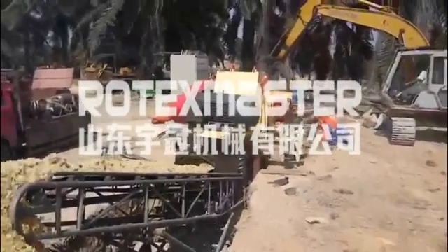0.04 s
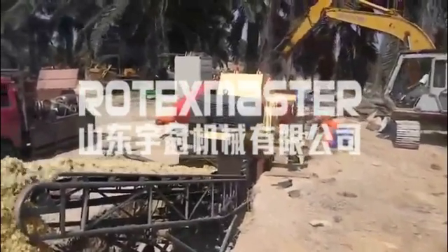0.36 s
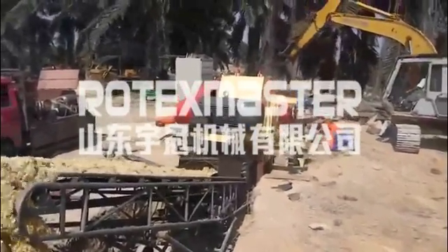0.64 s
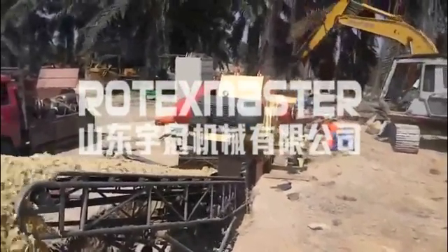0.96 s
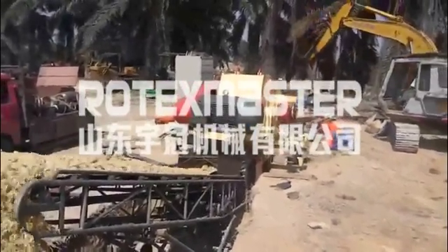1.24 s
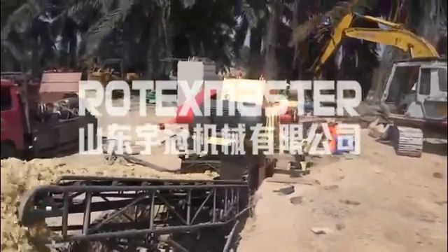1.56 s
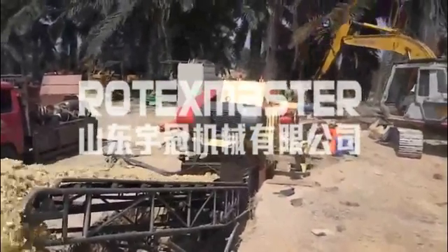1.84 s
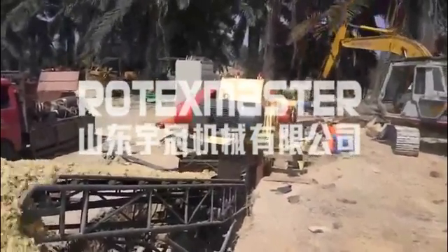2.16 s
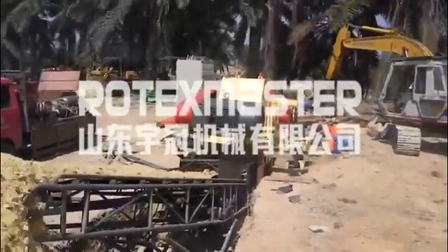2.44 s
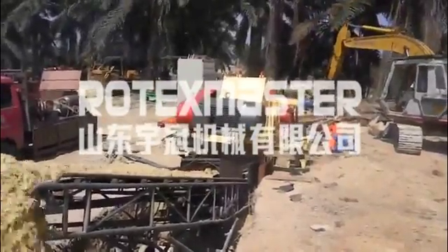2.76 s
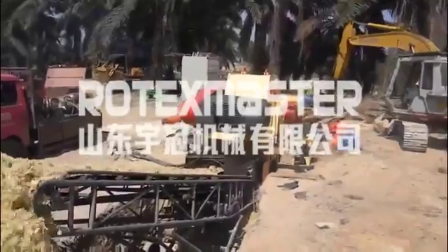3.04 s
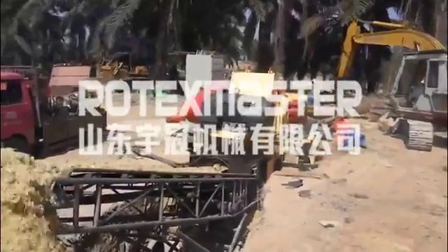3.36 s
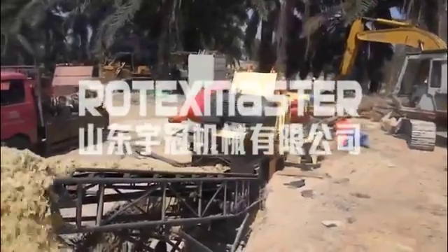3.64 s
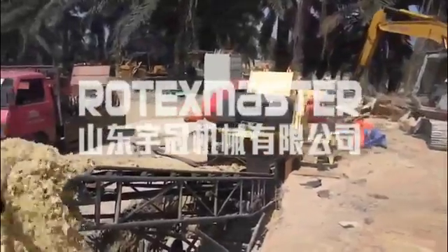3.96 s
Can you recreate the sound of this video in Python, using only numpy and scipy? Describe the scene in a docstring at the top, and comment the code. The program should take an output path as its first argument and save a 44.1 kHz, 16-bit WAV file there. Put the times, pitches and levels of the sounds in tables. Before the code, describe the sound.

A diesel wood chipper roars close by outdoors for all four seconds, its drum thumping rapidly over engine drone, crackling chips and a faint high whine. An excavator's low hum swells and sinks alongside. Wood knocks against steel around 0.5 seconds, near 1.9 and in a cluster at 2.6. From 2 seconds, chips leave in brief hissing sprays, and splinters rasp along the chute, most strongly near 3.4.

```python
"""A fast thumping comes first: a diesel drum chipper, close by at an outdoor site, in stereo.
The drum thumps once a turn in its housing over the engine's drone; an excavator runs beside it.
Shredded wood roars through the machine, chips crackle and splinters rasp along the chute.
Now and then a larger piece knocks against the steel; later, chips leave in brief sprays."""
import sys
import numpy as np
from scipy import signal
from scipy.fft import rfft, irfft
from scipy.io import wavfile

SR = 44100
rng = np.random.default_rng(int(sys.argv[2]) if len(sys.argv) > 2 else 0)


def master_out(mix):
    """Clip the mix to full scale and print it as 16-bit PCM to the path in sys.argv[1]."""
    frames = np.transpose(np.atleast_2d(mix))
    ceiling = np.clip(frames, -1, 1)
    pcm = np.round(ceiling * 32767).astype(np.int16)
    wavfile.write(sys.argv[1], SR, pcm)


N = 176400
BIN_HZ = np.maximum(np.arange(N // 2 + 1) * SR / N, 1)


def undb(db):
    """Decibels to gain."""
    return 10 ** (np.asarray(db) / 20)


def level(x, db=0):
    """Set the rms level."""
    return x * undb(db) / np.sqrt(np.mean(x ** 2))


def follow(t, points):
    """Read (t/s, value) points at the times t."""
    return np.interp(t, *np.array(points).T)


def curve(points):
    """Read (f/Hz, value) points on a log-frequency axis."""
    hz, value = np.array(points).T
    return np.interp(np.log(BIN_HZ), np.log(hz), value)


def bell(x):
    """Gaussian with a peak and a spread of 1."""
    return np.exp(-.5 * x ** 2)


def colour(x, points):
    """Causal filter with the given (f/Hz, gain/dB) shape."""
    cepstrum = irfft(np.log(undb(curve(points))), N)
    cepstrum[1:N // 2] *= 2
    cepstrum[N // 2 + 1:] = 0
    return irfft(rfft(x) * np.exp(rfft(cepstrum)), N)


def band(x, hz, octaves):
    """Broad bell-shaped band."""
    return irfft(rfft(x) * bell(np.log2(BIN_HZ / hz) / octaves), N)


def lowpass(x, hz, order=4):
    """Keep what lies below hz, with no phase shift."""
    return irfft(rfft(x) / (1 + (BIN_HZ / hz) ** order), N)


def resonance(hz, width):
    """Response of one damped mode."""
    return 1 / (1 + 1j * (BIN_HZ ** 2 - hz ** 2) / (BIN_HZ * width))


def drift(rate_hz):
    """Smooth random motion with a spread of 1."""
    return level(lowpass(rng.standard_normal(N), rate_hz))


def clicks(times, sizes):
    """One impulse at each time."""
    return np.bincount(np.clip(times * SR, 0, N).astype(int), sizes, N + 1)[:N]


# width at the microphones: f/Hz, side minus mid/dB
STEREO_WIDTH = [(60, -21.5), (170, -34), (280, -12.5), (500, -10.5), (1200, -8.5), (2500, -7.5), (9000, -7)]
# balance: f/Hz, left minus right/dB
STEREO_PAN = [(60, -3.5), (180, -1.5), (350, -7), (700, -3.5), (1400, -1.7), (2800, -2.5), (5000, 1.2),
              (9000, -1.5)]
# lead of the left microphone: f/Hz, phase/rad
LEFT_LEAD = [(0, 0), (340, -0.051), (600, 0.7), (1380, 0.29), (3360, 0.76), (4220, 0.55), (5430, 0.2),
             (8530, -0.62), (9820, 0.0)]

def stereo_noise():
    """Noise alike in the bass, wide in the treble, reaching the two microphones out of step."""
    mid, side = rfft(rng.standard_normal((2, N)))
    sign = np.array([[1], [-1]])
    microphones = undb(sign * curve(STEREO_PAN) / 2) * np.exp(.5j * sign * curve(LEFT_LEAD))
    return irfft((mid + sign * side * undb(curve(STEREO_WIDTH))) * microphones, N)


# ring of the drum housing: f/Hz, gain/dB
HOUSING_RING = [(30, -30), (44, -15.5), (90, -17.5), (120, -16.5), (170, -3), (200, -2.5), (224, 1.5),
                (255, -1.5), (290, -13), (310, -10.5), (345, -29.5), (400, -14.5), (520, -32),
                (1500, -53.5)]
# strength of the thumps: t/s, relative level/dB
THUMP_FORCE = [(0, -4.5), (.2, 0), (.4, -4), (.75, -3), (1.05, -1.5), (1.5, .5), (2.3, -0.5), (2.52, 2),
               (2.75, -4), (3.5, 1), (4, 0.5)]
# heavy bites into the wood: t/s, boost/dB
HEAVY_BITES = [(.226, 5), (.271, 4.5), (.497, 4.5), (1.538, 2.5), (1.72, 2), (1.90, 3), (2.945, 5.5),
               (3.21, 4.5)]

def drum(t, turns):
    """One uneven thump a turn rings the housing, harder when the drum bites deep."""
    delay_s, jitter_s, scatter_db, pan_db = .0003, .00015, .8, -.4
    size, late = rng.standard_normal((int(turns[-1]) + 1, 2)).T
    times = np.interp(np.arange(len(size)), turns, t) + delay_s + jitter_s * late
    force_db = follow(times, THUMP_FORCE) + scatter_db * size
    for at, db in HEAVY_BITES:
        force_db[np.argmin(abs(times - at))] += db
    thumps = level(colour(clicks(times, undb(force_db)), HOUSING_RING), db=-23.8)
    return thumps * undb([[pan_db / 2], [-pan_db / 2]])


# the diesel, centred between the microphones: multiple of shaft speed, level/dB
ENGINE_HARMONICS = [(2, -38), (3, -33.5), (4, -39.5), (5, -44.5), (6, -33), (7, -43.5)]

def engine(turns):
    """The firing drone is locked to the shaft; each harmonic wavers on its own."""
    waver_db, exhaust_lag_turns = 2, .555
    phase = 2 * np.pi * (turns - exhaust_lag_turns)
    return sum(undb(db + waver_db * drift(4.8)) * np.sqrt(2) * np.cos(k * phase)
               for k, db in ENGINE_HARMONICS)


# other machinery on the site: f/Hz, width/Hz, level/dB
MACHINE_HUMS = [(182.2, 5.7, -32.5), (202.6, 3.7, -32), (379, 6.8, -44), (402.8, 6.8, -42.5),
                (416, 4.9, -39.5), (604.3, 12, -40.5), (775, 40, -43)]

def machinery():
    """Other machinery hums in narrow bands of noise that waver together."""
    waver_db = 1.5
    power = sum(level(abs(resonance(hz, width)) ** 2, db) ** 2 for hz, width, db in MACHINE_HUMS)
    return irfft(rfft(stereo_noise()) * np.sqrt(power), N) * undb(waver_db * drift(1.9))


# rumble and roar from inside the drum, each: f/Hz, gain/dB
WOOD_RUMBLE = [(20, -27.5), (45, -17.5), (70, -6), (95, -2.5), (135, -1), (170, -0.5), (225, -2.5),
               (270, -9), (330, -20), (600, -40)]
WOOD_ROAR = [(150, -6.5), (330, -1), (440, 2.5), (540, 0.5), (730, 3), (980, -3.5), (1150, -3),
             (1500, -5.5), (1780, -4), (2050, -8.5), (2450, -7), (3300, -12.5), (3600, -16.5),
             (4300, -15.5), (5000, -18.5), (5400, -20), (6800, -22.5), (7100, -25), (8200, -21.5),
             (8800, -24.5), (10200, -38)]
# the roar above 2 kHz: t/s, gain/dB
TREBLE_SWELL = [(.12, 2), (.2, -2), (.4, 1.8), (.66, -0.7), (.88, 1.5), (1.2, -0.7), (1.5, -1.6),
                (2.03, -0.4), (2.25, -1.3), (2.8, 2), (3.45, 0.3), (3.56, -0.5), (3.72, 1.5), (3.9, -2.5),
                (4, 2)]

def shredding(t, turns):
    """Wood rumbles and roars in the drum; the rumble surges on each cut, the treble flickers."""
    cut_at_turns, cut_width_turns = .052, .2
    surge_db, dip_db, flicker_db, treble_flicker_db = 5, -.3, .1, 1.2
    turns_from_cut = (turns - cut_at_turns + .5) % 1 - .5
    cut = bell(turns_from_cut / cut_width_turns)
    rumble = colour(stereo_noise(), WOOD_RUMBLE) * undb(surge_db * cut)
    roar = colour(stereo_noise(), WOOD_ROAR)
    low = lowpass(roar, hz=2000)
    treble = (roar - low) * undb(follow(t, TREBLE_SWELL) + treble_flicker_db * drift(22))
    roar = (low + treble) * undb(dip_db * cut + flicker_db * drift(25))
    return level(rumble, db=-24.5) + level(roar, db=-22.5)


def tone(hz, db):
    """Sine with a moving pitch and rms level."""
    return np.sqrt(2) * undb(db) * np.sin(2 * np.pi * np.cumsum(hz) / SR)


# hum beside the chipper: t/s, f/Hz, level/dB
LOW_HUM = [(0, 130, -39), (.3, 135, -27.5), (.55, 130, -30), (.8, 127, -26), (1.25, 126, -36),
           (1.9, 128.1, -31), (2.65, 126, -35.5), (3.05, 126, -28), (3.5, 126, -39)]

def low_hum(t):
    """A low hum swells and sinks, probably the excavator under load."""
    wander_hz, waver_db = 3, 2
    at, hz, db = np.array(LOW_HUM).T
    pitch = np.interp(t, at, hz) + wander_hz * drift(3.46)
    return tone(pitch, np.interp(t, at, db) + waver_db * drift(6))


# whines, centred between the microphones: f/Hz, level/dB
HIGH_WHINES = [(3820, -47.5), (3945, -49), (4215, -53.5)]

def whines():
    """High whines wander in pitch together, each rough on its own."""
    wander_hz, rough_hz, flicker_db = 10.75, 21.8, 4
    wander = wander_hz * drift(4.94)
    return sum(tone(hz + wander + rough_hz * drift(60), db + flicker_db * drift(30))
               for hz, db in HIGH_WHINES)


# crackle from the chute: f/Hz, gain/dB
CHIP_SPECTRUM = [(400, -6), (900, 6.5), (1800, -2), (3000, -3), (4500, -7.5), (7000, -10.5), (10000, -32.5)]

def chips():
    """Small chips tick in the chute, each a tiny burst of noise, a few much louder than the rest."""
    per_s, spread_db, decay_s = 330, 2.2, .003
    when, size = rng.random((int(per_s * N / SR), 2)).T
    energy = clicks(when * N / SR, undb(-spread_db * np.log(.045 + size)) ** 2)
    envelope = np.sqrt(signal.lfilter([1], [1, -np.exp(-2 / (decay_s * SR))], energy))
    return level(colour(stereo_noise() * envelope, CHIP_SPECTRUM), db=-34)


# modes of the chute: f/Hz, width/Hz, gain/dB
CHUTE_MODES = [(2360, 280, -1), (3255, 210, 1), (4400, 150, -12), (5340, 240, -7.5)]
# wood rasping along it, steady until the first row: t/s, level/dB
RASP_LEVEL = [(2.25, -41), (2.35, -37), (2.45, -42), (2.65, -35), (3.14, -36.5), (3.22, -42), (3.31, -40),
              (3.345, -27.5), (3.4, -37), (3.47, -32), (3.56, -47)]

def rasp(t):
    """Splinters scrape the chute: dense uneven ticks, scattered left and right, ring its modes."""
    per_s, spread_db = 900, 3.5
    when, size, left = rng.random((int(per_s * N / SR), 3)).T
    strength = undb(-spread_db * np.log(.05 + size))
    ticks = np.array([clicks(when * N / SR, strength * share) for share in (left, 1 - left)])
    chute = sum(undb(db) * resonance(hz, width) for hz, width, db in CHUTE_MODES)
    return level(irfft(rfft(ticks) * chute, N)) * undb(follow(t, RASP_LEVEL))


# wood on steel: t/s, crack level/dB, crack decay/s, crack centre/Hz, ring pitch/Hz, ring gain/dB
WOOD_KNOCKS = [(.4792, -21.5, 0.0099, 1700, 1340, -17), (.4805, -34, .006, 3100, 1390, -20),
               (0.482, -36, .006, 3700, 1840, -17), (.493, -24, .007, 1800, 1320, -24),
               (.577, -27, .015, 2200, 1480, -22), (.694, -29, .0064, 2300, 1830, -14),
               (1.0014, -35.5, .008, 2800, 1790, -19.5), (1.70, -38, .012, 4600, 1890, -23),
               (1.8524, -25, .0075, 1400, 1150, -31), (2.3326, -31, .012, 3100, 2054, -16),
               (2.346, -35, .014, 3000, 1980, -22), (2.571, -26, 0.02, 1800, 1710, -23),
               (2.603, -21.5, .012, 1320, 1080, -21), (2.6123, -25, 0.0053, 2200, 1490, -16.5),
               (2.617, -20, .008, 890, 686, -19), (2.6225, -27, .007, 2000, 1436, -25),
               (2.63, -22, 0.0056, 1500, 1040, -23), (2.9253, -27, 0.011, 1500, 1210, -29)]
# modes of a struck piece: multiple of its pitch, gain/dB, decay/s
PIECE_MODES = [(0.999, -3.5, 0.0046), (1.6, -4.5, 0.01), (2.397, -8, 0.01), (3.01, -9, 0.017)]

def knocks(t):
    """Larger pieces crack against the steel and ring briefly; a brighter blow favours higher modes."""
    length_s, ring_octaves = .15, .56
    out, noise = np.zeros((2, N)), stereo_noise()
    ratio, mode_db, ring_s = np.array(PIECE_MODES).T[:, :, None]
    for at, db, decay_s, centre_hz, pitch, ring_db in WOOD_KNOCKS:
        span = (t >= at) & (t < at + length_s)
        age = t[span] - at
        crack = level(band(noise, centre_hz, octaves=1), db)[:, span] * np.exp(-age / decay_s)
        mode_hz = ratio * pitch
        weight = undb(mode_db) * bell(np.log2(mode_hz / centre_hz) / ring_octaves)
        modes = weight * np.exp(-age / ring_s) * np.sin(2 * np.pi * mode_hz * age)
        out[:, span] += crack + undb(ring_db) * modes.sum(axis=0)
    return out


# sprays at the mouth of the chute: peak t/s, level/dB, half length/s, centre f/Hz
CHIP_SPRAYS = [(2.003, -38.5, 0.073, 6000), (2.352, -31, 0.015, 2800), (2.904, -31, .022, 2520),
               (3.355, -31, 0.027, 5300)]

def sprays(t):
    """Chips leave the chute in brief swells of hiss."""
    hiss = stereo_noise()
    return sum(level(band(hiss, hz, octaves=.58), db) * bell((t - at) / half_s)
               for at, db, half_s, hz in CHIP_SPRAYS)


# speed of the drum: t/s, rotation f/Hz
DRUM_SPEED = [(0, 22.14), (.35, 22.11), (.75, 22.03), (1.4, 22.11), (2.1, 22.15), (2.75, 22.12),
              (3.25, 22.04), (4, 22.07)]
# deep bass of the running machines: t/s, gain/dB
BASS_SWELL = [(0, -1), (1.25, -1), (2.2, 2.5), (2.55, -3.5), (2.95, .5), (3.45, -4.5), (3.75, 1)]

def scene():
    """The site from the microphones: one shaft times drum, drone and cuts; the bass swells and sinks."""
    t = np.arange(N) / SR
    turns = np.cumsum(follow(t, DRUM_SPEED)) / SR
    running = drum(t, turns) + engine(turns) + machinery() + shredding(t, turns)
    bass = lowpass(running, hz=105, order=8)
    running += bass * (undb(follow(t, BASS_SWELL)) - 1)
    return running + low_hum(t) + whines() + chips() + rasp(t) + knocks(t) + sprays(t)


def record(dry):
    """The recorder cuts the top steeply."""
    top_hz = 10300
    return signal.sosfilt(signal.ellip(12, .2, 80, top_hz, fs=SR, output="sos"), dry)


dry = scene()
out = record(dry)
master_out(out)
```